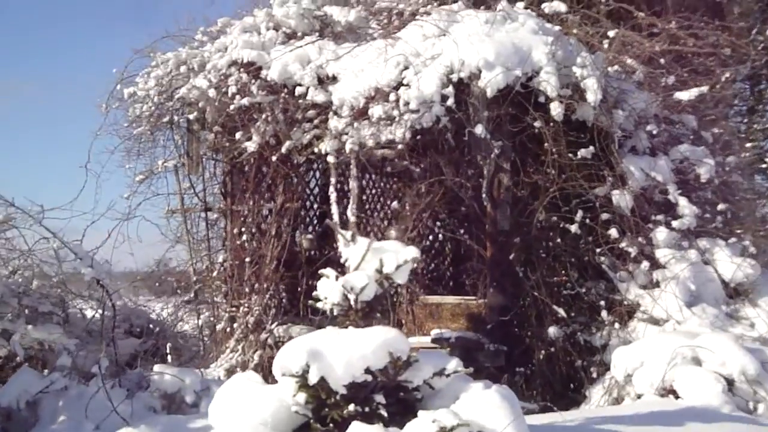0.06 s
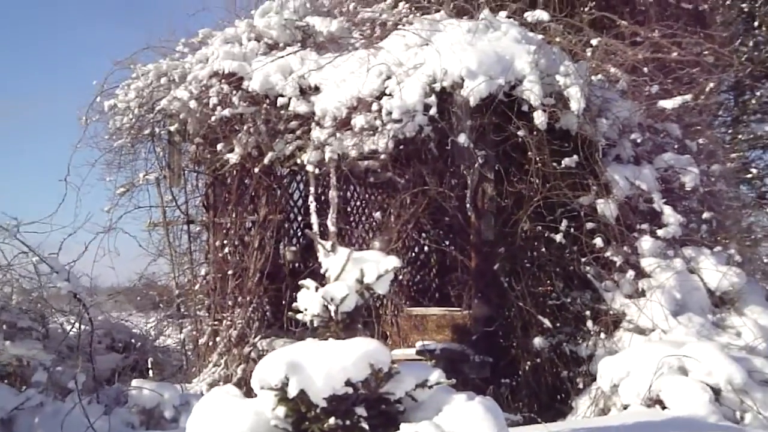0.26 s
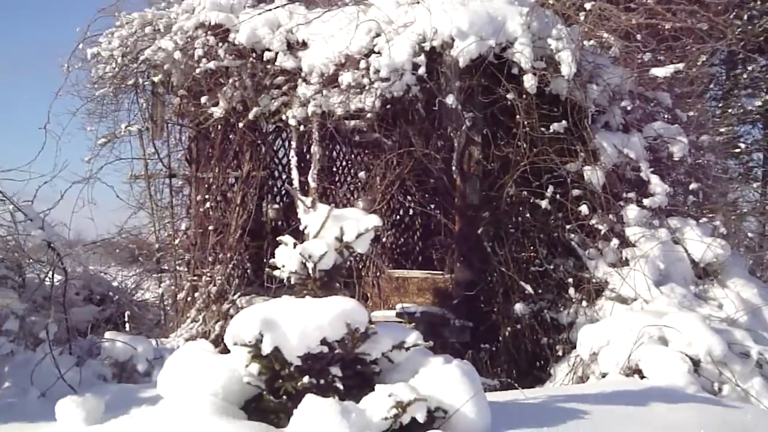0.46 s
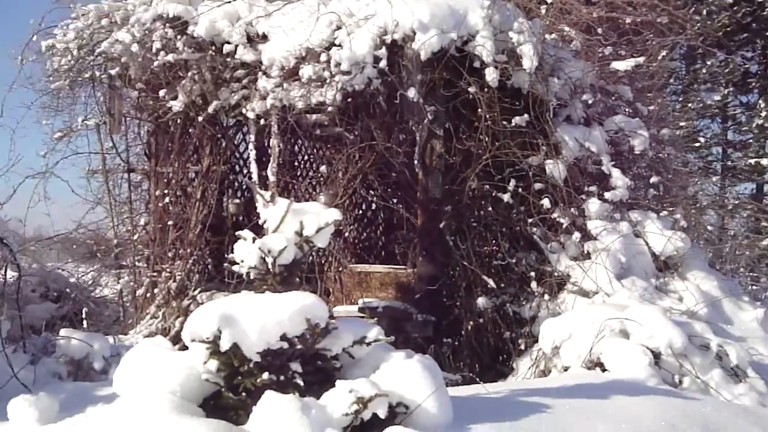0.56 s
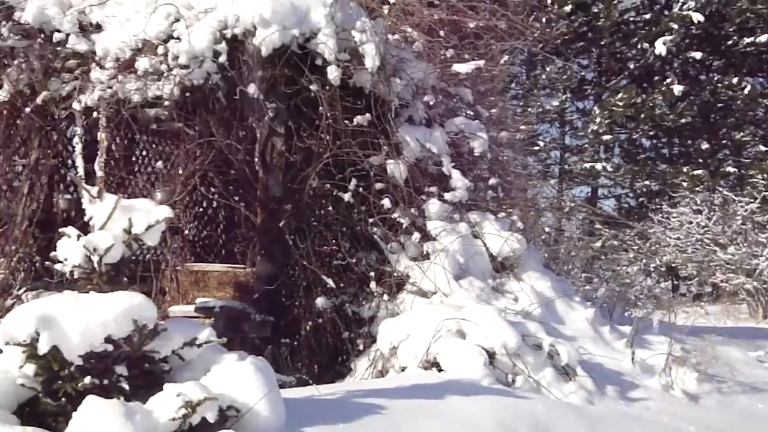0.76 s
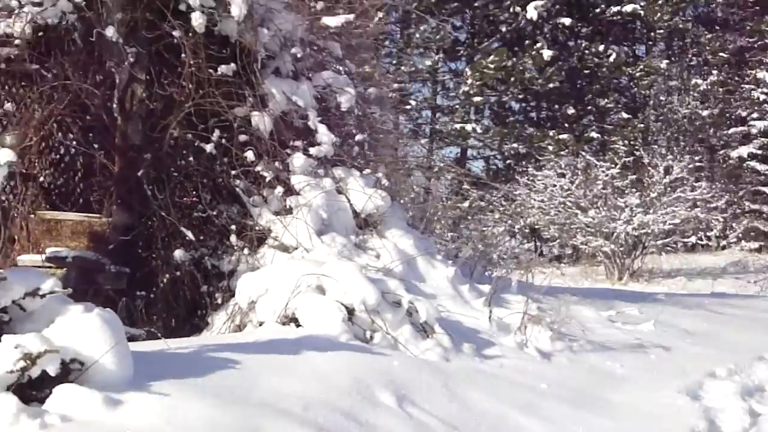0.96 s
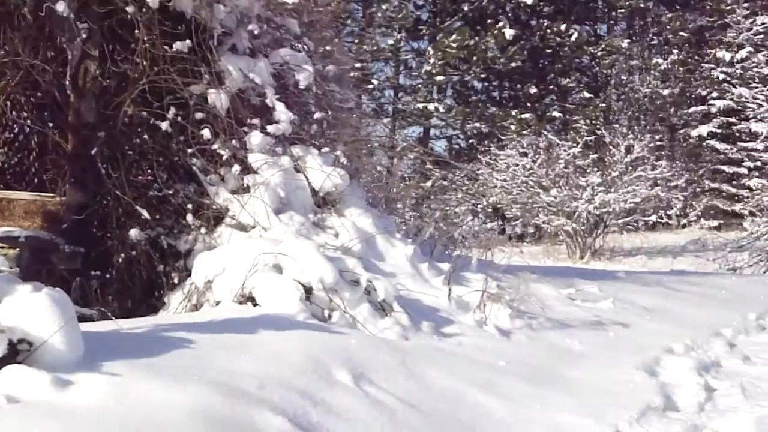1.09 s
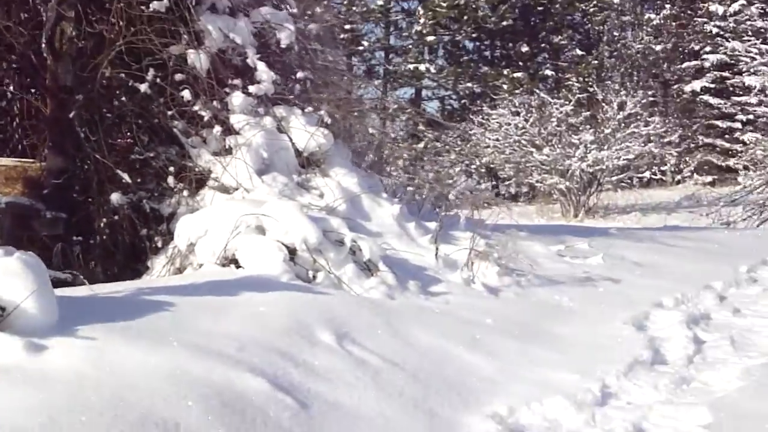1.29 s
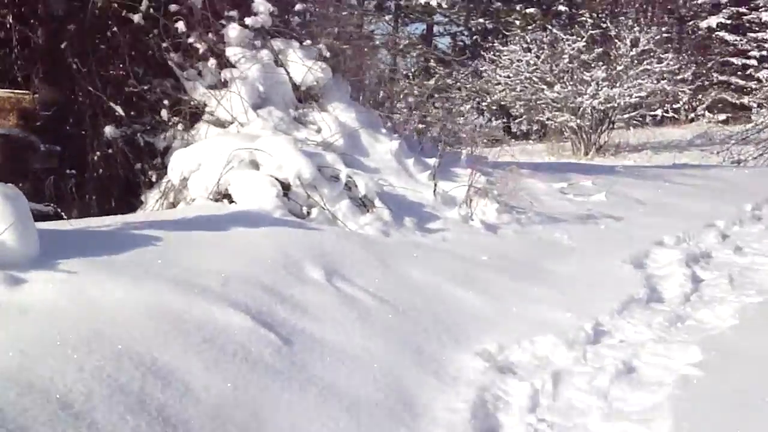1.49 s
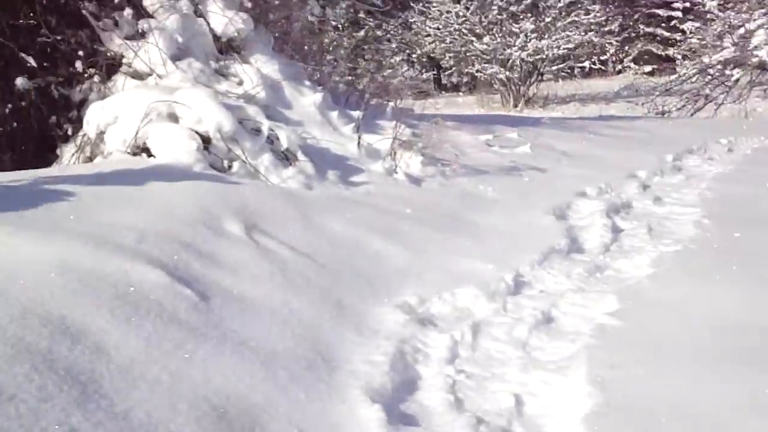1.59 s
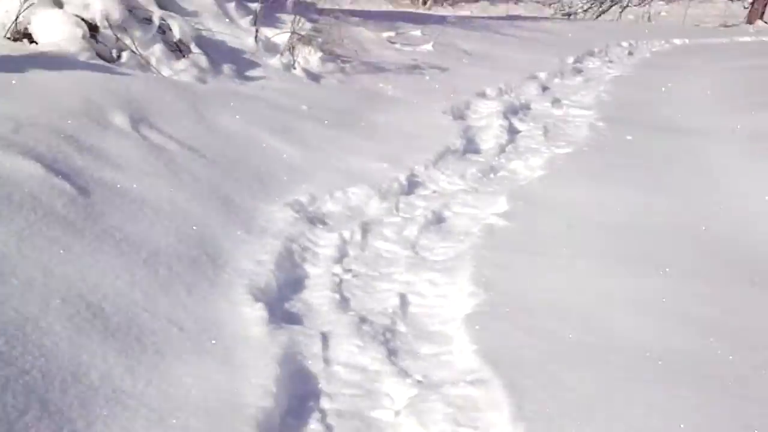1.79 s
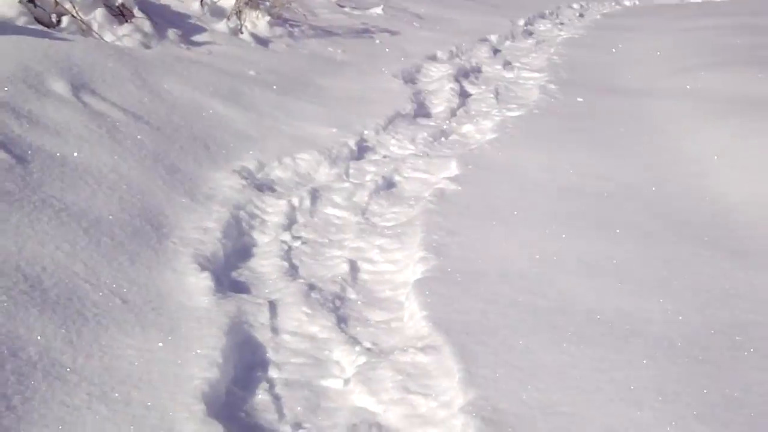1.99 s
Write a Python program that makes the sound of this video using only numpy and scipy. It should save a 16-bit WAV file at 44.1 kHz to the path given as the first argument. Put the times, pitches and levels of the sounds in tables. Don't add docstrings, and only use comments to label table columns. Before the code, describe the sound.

Footsteps in deep dry snow, heard close outdoors. From 0.1 s a crunch grows with dull snaps, strongest at 0.45-0.65 s, then stops abruptly. Loose snow scuffs, a twig cracks near 0.9 s, and the hand rumbles and thumps on the camera around 1.1 s. A denser second crunch runs 1.3-1.6 s with icy ticks, then crackles until 1.8 s. Steady hiss and faint high rapid motor ticking continue throughout.

```python
import sys
import numpy as np
from scipy import signal
from scipy.fft import rfft, irfft, next_fast_len
from scipy.io import wavfile

SR = 44100
rng = np.random.default_rng(int(sys.argv[2]) if len(sys.argv) > 2 else 0)


def int16_out(signal):
    q = np.round(np.clip(np.atleast_2d(signal).T, -1, 1) * 32767)
    wavfile.write(sys.argv[1], SR, q.astype(np.int16))


def undo_db(level):
    steps = np.asarray(level, float) / 20
    return 10 ** steps


N = 90404
T = np.arange(N) / SR

# start_s, level_db
STEPS = [
    [(.1, -60), (.25, -52.5), (.33, -44), (.42, -46), (.46, -39), (.55, -40), (.62, -41.5), (.648, -41),
     (.662, -67)],
    [(1.29, -60), (1.32, -39), (1.38, -38), (1.41, -41), (1.455, -40), (1.475, -46), (1.51, -38.5),
     (1.575, -41.5), (1.62, -55)],
]
# pitch_hz, level_db (per Hz)
SNOW = [(88, -27), (150, -2.5), (927, 0.5), (1180, -1), (1900, -1.5), (2830, -8.5), (3600, -28.5),
        (4680, -92), (7920, -120)]
# pitch_hz, level_db (per Hz)
POWDER = [(3000, -69), (3700, -3.5), (4800, -2), (5800, -3.5), (11000, -9.5)]
# start_s, level_db
POWDER_SHARE = [(0, -28), (.66, -16.5), (.7, -15), (.95, -12), (1.28, -12), (1.35, -11.5), (1.6, -17),
                (2.05, -7)]
GRAINS_PER_S, GRAIN_CYCLES, GRAIN_SPREAD_DB = 7000, 5.23, 2.4
CLUMPS_PER_S, CLUMP_DB, POWDER_PATCH_DB = 126, 0.7, 2.0

# middle_s, half_length_s, level_db
SCUFFS = [(0.706, 0.0082, -39.5), (0.737, 0.0075, -50), (0.761, 0.0038, -44), (0.809, 0.0037, -44),
          (0.913, 0.0095, -43), (0.981, 0.0054, -49), (1.074, 0.025, -58.5), (1.157, 0.0068, -44.5),
          (1.19, 0.0076, -40), (1.275, 0.0087, -42), (1.114, 0.033, -58), (1.236, 0.029, -52.5),
          (1.781, 0.029, -48), (1.994, 0.046, -53.5)]
SCUFF_RISE_SHARE = 0.69

# start_s, peak_db, pitch_hz, bright_part_db,
# ring_cycles
BOND_SNAPS = [(.1245, -29, 597, -22, 2.2), (.175, -36.5, 537, 0, 4.9), (.1975, -33.5, 557, -18, 2.3),
              (.217, -34, 651, -6, 2), (.243, -32.5, 500, -26, 4.7), (.2622, -36, 546, 0, 5.3),
              (.282, -31, 535, -17, 4), (.300, -30, 520, -14, 9.7), (.312, -29, 680, -8, 12),
              (.319, -20, 660, -24, 0.56), (.343, -28, 1010, -22, 16), (.366, -40, 557, -14, 6.6),
              (.430, -25, 834, -25, 7.4), (.444, -27, 464, -8, 1.4), (.461, -35, 1300, -22, 3.2),
              (.47, -20.5, 567, -24, 2.8), (.483, -17.5, 610, -27, 2.1), (.499, -22, 950, -28, 3.3),
              (.518, -16, 740, -33, 5.7), (.594, -15, 820, -17, 3.4), (.651, -17.5, 1070, -21.5, 9.3),
              (.576, -32, 800, -15, 4), (.294, -34, 550, -12, 3), (.380, -40, 1500, -15, 4),
              (.392, -36, 800, -15, 3.4), (.452, -30, 447, -20, 1.8),
              (1.153, -34, 704, -17, 4.4), (1.1842, -28.5, 800, -16, 2.8), (0.893, -38, 1500, -15, 4.4),
                 (.906, -26, 945, -12, 5.7), (.914, -24, 990, -5, 3.2), (1.07, -40.5, 1500, -6, 3.6),
                 (1.131, -38, 1680, -17, 5), (1.171, -33.5, 1480, -12, 6.2),
                 (1.237, -23.5, 1050, -11.5, 7.7), (1.243, -36, 2500, -10, 4.6),
                 (1.26, -31.5, 1200, -6, 2.8), (1.298, -18.5, 550, -5.5, 1.4),
              (1.333, -14.5, 705, -17, 2.1), (1.351, -14.5, 760, -30, 2.5), (1.362, -27, 805, -18, 1.1),
                (1.38, -16, 800, -16, 1.1), (1.524, -14, 1170, -31, 5.9), (1.5411, -26, 1900, -15, 6),
                (1.506, -27, 790, -8, 2.7), (1.511, -30, 900, -12, 4.4), (1.489, -28.5, 445, -9, 4),
                (1.626, -35.5, 910, -11, 3.5), (1.561, -24, 780, -18, 3.6), (1.5675, -23, 790, -12, 2.1),
                (1.577, -13.5, 1180, -30, 4.7), (1.314, -31, 900, -13, 2.4), (1.32, -33, 900, -14, 3),
                (1.394, -33, 900, -15, 2.2), (1.407, -32, 1000, -11, 3), (1.646, -39.5, 660, 2, 1.8),
                (1.691, -37, 804, 2, 3.6), (1.7036, -19, 920, -4.5, 2.1), (1.706, -32, 500, -20, 3.9),
                (1.708, -30, 1160, -17, 4.5), (1.7125, -36, 750, -6, 5.7), (1.7227, -28, 600, -11, 3.5),
                (1.7275, -32.5, 700, -1, 3), (1.7417, -27.5, 550, -6, 4.5), (1.773, -22, 620, -18, 3.3),
                (1.7744, -20, 1760, -31, 20), (1.7751, -17.5, 1090, -30, 8.6), (1.782, -32, 510, -13, 2.2),
                (1.792, -31, 800, -2, 2.2)]
SNAPS = BOND_SNAPS
SNAP_LAG_S, SNAP_CYCLES, SNAP_DB = .002, 1, -0.5
SAG_SHARE = 0.43
SNAP_LOW_HZ, SNAP_HIGH_HZ = 228, 2920
BRIGHT_HZ, BRIGHT_T60_S = 1900, 0.0016
SPARK_HZ, SPARK_DB = 4500, -14
CRUMBLE_T60_S, CRUMBLE_DB = 0.022, -20.5

# trough_s, peak_db, pitch_hz, swell_cycles
TWIG = [
    (.8823, -24, 2110, 1.8),
    (.8823, -30.5, 3160, 2),
    (.8838, -30.5, 920, 1.3),
    (0.99, -43.5, 4900, 2.3),
]
# trough_s, peak_db, pitch_hz
CRUMBS = [(1.319, -59, 4500), (1.344, -45, 4500), (1.352, -49, 5230), (1.375, -48, 4900),
          (1.395, -56, 5200), (1.405, -45, 4760), (1.415, -50, 4970), (1.426, -41.5, 4960),
          (1.43, -48, 5400), (1.445, -46, 4940), (1.455, -45, 4900), (1.489, -47, 4800), (1.51, -48, 4800)]
CRUMB_CYCLES = 4.8

# start_s, level_db
GRIP = [(.87, -73), (.9, -47), (.95, -58.5), (.99, -48.5), (1.03, -70), (1.1, -40), (1.135, -68),
        (1.165, -53), (1.215, -48), (1.245, -63), (1.275, -45.5), (1.37, -47.5), (1.45, -49.5), (1.53, -55),
        (1.595, -45.5), (1.62, -62), (1.68, -53), (1.71, -72)]
GRIP_LOW_HZ, GRIP_HIGH_HZ = 59.7, 139.7
# start_s, level_db
RUB = [(.87, -80), (.89, -54), (.912, -59), (.936, -66), (.974, -54.5), (1.0, -53), (1.026, -65),
       (1.062, -50), (1.12, -62), (1.135, -77), (1.155, -60), (1.204, -51), (1.242, -74.5), (1.27, -51),
       (1.312, -50), (1.4, -53), (1.45, -48.5), (1.6, -57), (1.626, -76), (1.7, -60), (1.75, -67)]
RUB_LOW_HZ, RUB_HIGH_HZ = 149, 341
GRIP_LUMP_DB, RUMBLE_EVEN_SHARE = 1.2, 0.6
# trough_s, peak_db, pitch_hz, swell_cycles
THUMPS = [(1.0836, -27, 207, 1.33), (1.0836, -33, 418, 1.4), (1.0995, -35.5, 396, 1.14),
          (1.1045, -38, 230, 0.73), (1.045, -45, 196, 1.3), (1.2, -37, 135, 1.4), (1.116, -43.5, 76, 0.75),
          (1.163, -39.5, 107, 0.9), (1.208, -42, 110, 1), (1.205, -43, 285, 1.4), (0.99, -46, 106, 1.3),
          (1.5, -33, 120, 0.95), (1.318, -39, 180, 0.9), (1.4, -34, 120, 0.92), (1.188, -44.5, 380, 2.6)]
# crest_s, peak_db, pitch_hz, swell_cycles
BUMPS = [
    (1.472, -25, 224, 0.65),
    (.6557, -23, 495, 0.72),
]

# start_s, peak_db
TICK = [(0, -47.5), (.28, -51), (.38, -60), (.46, -50), (.6, -48.5), (.72, -53), (.85, -48.5), (1.4, -49.5),
        (1.47, -51), (1.55, -46), (1.65, -50.5), (1.9, -48), (2.05, -51)]
FIELD_HZ, TICK_START_S = 59.94, .0063
TICK_HZ, TICK_WIDTH_S, TICK_SCATTER_DB = 8540, 0.00042, 1.5
TICK_SLIP = .45
# middle_s, level_db
WHINES = [
    (.225, -58.5),
    (.612, -62),
    (1.0, -62),
    (1.083, -60),
    (1.30, -58),
]
WHINE_HZ, WHINE_HALF_S = 8600, 0.01
WHIR_HZ, WHIR_T60_S, WHIR_DB = 5400, 0.0044, -68.5

# pitch_hz, level_db (per Hz)
HISS = [(41, -43), (70, -16), (458, -1.5), (1880, -7), (4100, -14), (5400, -16), (7100, -16), (8590, -18.5),
        (10800, -17.5), (14100, -46), (22000, -120)]
HISS_DB = -55
LOW_CUT_HZ, CUTOFF_HZ = 35, 11290


def rms_one(x):
    return x / np.sqrt(np.mean(x ** 2) + 1e-20)


def in_time(rows):
    return np.interp(T, *np.transpose(rows))


def drift(rate):
    r = np.exp(-2 * np.pi * rate / SR)
    wander = signal.lfilter([1], [1, -2 * r, r * r], rng.standard_normal(N + SR))
    return rms_one(wander[SR:])


def ring(x, hz, t60):
    r = undo_db(-60 / (t60 * SR))
    w = 2 * np.pi * hz / SR
    return signal.lfilter([0, np.sin(w)], [1, -2 * r * np.cos(w), r * r], x + 1e-18)


def colour(x, points):
    hz, db = np.transpose(points)
    size = next_fast_len(N)
    grid = np.maximum(np.arange(size // 2 + 1) * SR / size, 1)
    gain = undo_db(np.interp(np.log(grid), np.log(hz), db))
    return rms_one(irfft(rfft(x, size) * gain, size)[:N])


def band_pass(order, low_hz, high_hz):
    return signal.butter(order, [low_hz, high_hz], "band", fs=SR, output="sos")


def add(out, s, sound):
    i = int(s * SR)
    out[i:i + len(sound)] += sound[:len(out) - i]


def knock(hz, cycles, size):
    turns = np.arange(size) * hz / SR
    sag = SAG_SHARE * .5 * (1 - np.exp(-2 * turns))
    sound = -np.sin(2 * np.pi * (turns + sag)) * undo_db(-60 * turns / (cycles + 1))
    return sound / np.abs(sound).max()


def swells(rows):
    out = np.zeros(N)
    for s, db, hz, cycles in rows:
        age = np.maximum((T - s) * hz / cycles + 1, 0)
        swell = (age * np.exp(1 - age)) ** 2
        out -= undo_db(db) * swell * np.cos(2 * np.pi * hz * (T - s))
    return out


def snow_grains():
    sizes = undo_db(GRAIN_SPREAD_DB * np.minimum(rng.exponential(1, N), 4)) * rng.choice([-1, 1], N)
    born = rng.random(N) < GRAINS_PER_S / SR
    pitches = np.geomspace(170, 3600, 24)
    dealt = rng.integers(0, 24, N)
    flat = np.zeros(N)
    for k, hz in enumerate(pitches):
        t60 = GRAIN_CYCLES / hz
        once = ring(sizes * born * (dealt == k), hz, t60)
        flat += ring(once, hz, t60) * hz ** 2
    crush = colour(flat, SNOW) * undo_db(CLUMP_DB * drift(CLUMPS_PER_S))
    powder_level = undo_db(in_time(POWDER_SHARE) + POWDER_PATCH_DB * drift(49))
    return crush + powder_level * colour(rng.standard_normal(N), POWDER)


def crunch():
    power = np.zeros(N)
    for step in STEPS:
        power += undo_db(2 * in_time(step)) * (T > step[0][0]) * (T < step[-1][0])
    for s, half_s, db in SCUFFS:
        side = np.where(T < s, SCUFF_RISE_SHARE, 1)
        power += undo_db(2 * db) * np.exp(-((T - s) / half_s / side) ** 2)
    for s, db, *_ in SNAPS:
        debris_db = db + CRUMBLE_DB - 60 * np.abs(T - s) / CRUMBLE_T60_S
        power += undo_db(2 * debris_db) * (T > s + SNAP_LAG_S)
    return np.sqrt(power) * snow_grains()


def snaps():
    knocks, sparks = np.zeros(N), np.zeros(N)
    edge = knock(BRIGHT_HZ, BRIGHT_T60_S * BRIGHT_HZ, size=900)
    spark = knock(SPARK_HZ, 24.0, size=900)
    for s, db, hz, bright_db, cycles in SNAPS:
        body = knock(hz, SNAP_CYCLES * cycles, size=900)
        add(knocks, s + SNAP_LAG_S, undo_db(db + SNAP_DB) * (body + undo_db(bright_db) * edge))
        add(sparks, s + SNAP_LAG_S, undo_db(db + bright_db + SPARK_DB) * spark)
    low_cut = signal.butter(2, SNAP_LOW_HZ, "high", fs=SR, output="sos")
    muffle = signal.butter(6, SNAP_HIGH_HZ, fs=SR, output="sos")
    dull = signal.sosfilt(np.vstack([low_cut, muffle]), knocks + 1e-18)
    return dull + signal.sosfilt(band_pass(2, 3500, 6000), sparks + 1e-18)


def twig_and_crumbs():
    return swells(TWIG + [row + (CRUMB_CYCLES,) for row in CRUMBS])


def grip():
    out = swells(THUMPS) - swells(BUMPS)
    for curve, low_hz, high_hz in ((GRIP, GRIP_LOW_HZ, GRIP_HIGH_HZ), (RUB, RUB_LOW_HZ, RUB_HIGH_HZ)):
        noise = signal.sosfilt(band_pass(3, low_hz, high_hz), rng.standard_normal(N))
        outline = np.abs(signal.hilbert(noise)) + .3 * noise.std()
        noise = noise / outline ** RUMBLE_EVEN_SHARE
        out = out + rms_one(noise) * undo_db(in_time(curve) + GRIP_LUMP_DB * drift(11))
    return out


def focus_drive():
    place = (T - TICK_START_S) * FIELD_HZ
    field = np.round(place).astype(int)
    away = (place - field) / FIELD_HZ
    scatter, slip = rng.standard_normal((field.max() + 2, 2))[field].T
    tone = np.sin(2 * np.pi * TICK_HZ * away + TICK_SLIP * slip)
    blips = np.exp(-.5 * (away / TICK_WIDTH_S) ** 2) * tone
    ticks = undo_db(in_time(TICK) + TICK_SCATTER_DB * scatter) * blips
    whines = sum(undo_db(db) * np.exp(-((T - s) / WHINE_HALF_S) ** 4) for s, db in WHINES)
    whir = undo_db(WHIR_DB) * rms_one(ring(rng.standard_normal(N), WHIR_HZ, WHIR_T60_S))
    return ticks + whines * np.sin(2 * np.pi * WHINE_HZ * T) + whir


def recorder_hiss():
    return undo_db(HISS_DB) * colour(rng.standard_normal(N), HISS)


def scene():
    snow = crunch() + snaps() + twig_and_crumbs()
    return (snow + grip() + focus_drive() + recorder_hiss())[None]


def band_limit(x):
    return signal.sosfilt(signal.butter(12, 10980, fs=SR, output="sos"), x)


def record(dry):
    top_cut = signal.cheby2(24, 60, CUTOFF_HZ, fs=SR, output="sos")
    low_cut = signal.butter(2, LOW_CUT_HZ, "high", fs=SR, output="sos")
    mix = signal.sosfilt(np.vstack([top_cut, low_cut]), dry)
    return band_limit(mix)


dry = scene()
out = record(dry)
int16_out(out)
```